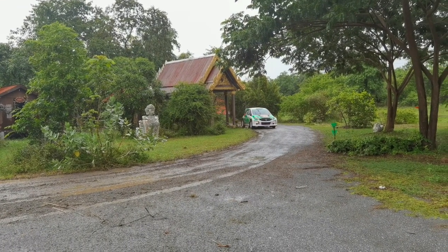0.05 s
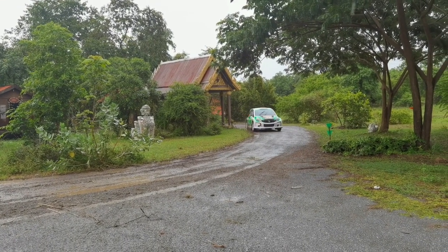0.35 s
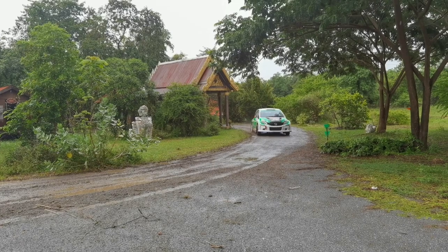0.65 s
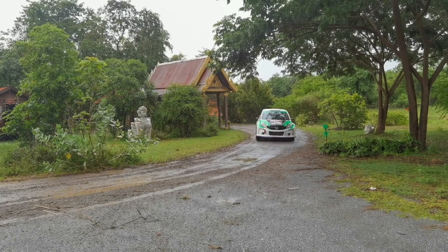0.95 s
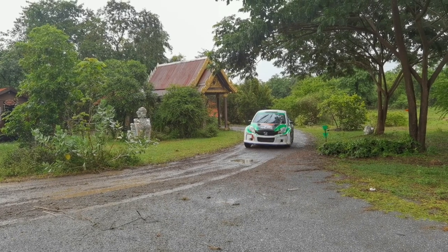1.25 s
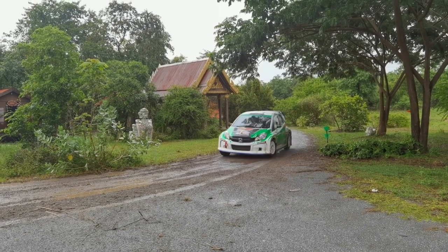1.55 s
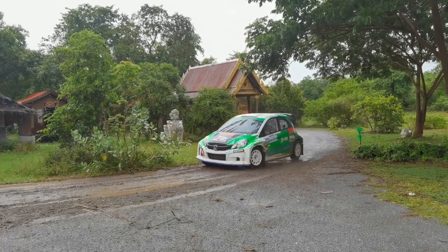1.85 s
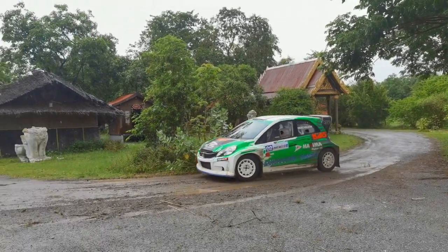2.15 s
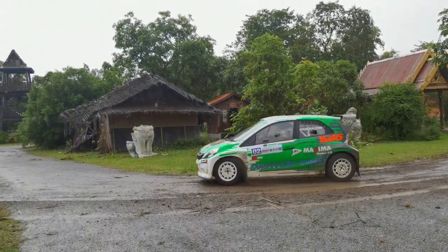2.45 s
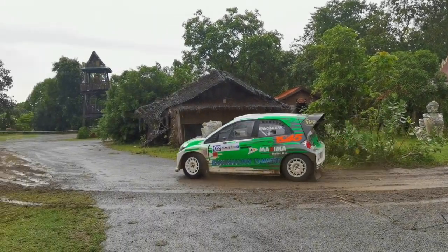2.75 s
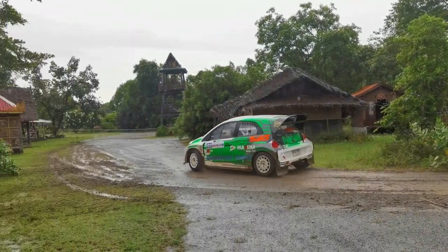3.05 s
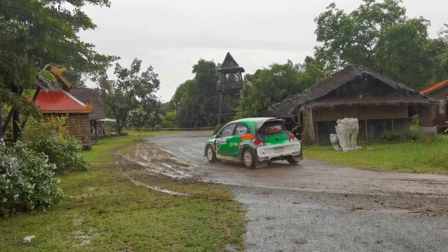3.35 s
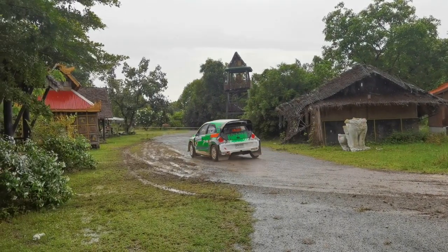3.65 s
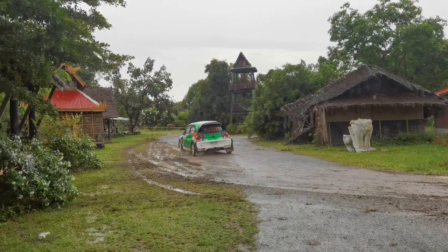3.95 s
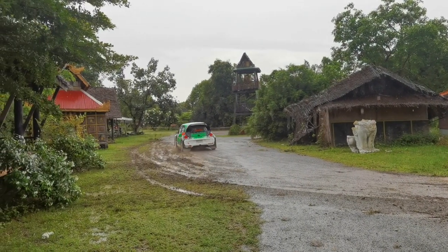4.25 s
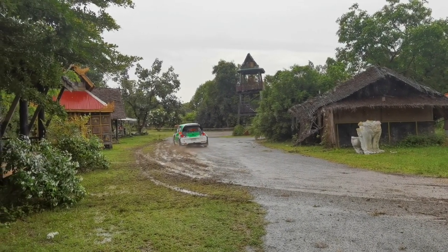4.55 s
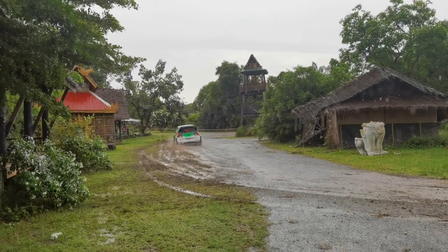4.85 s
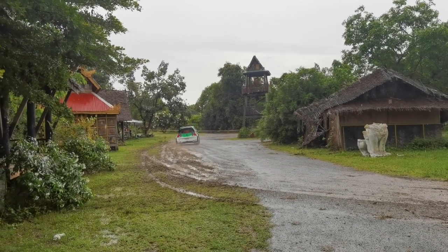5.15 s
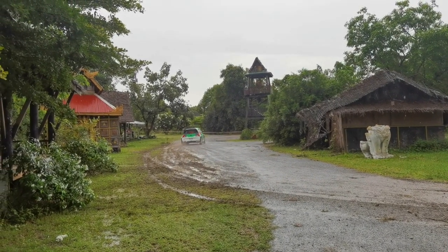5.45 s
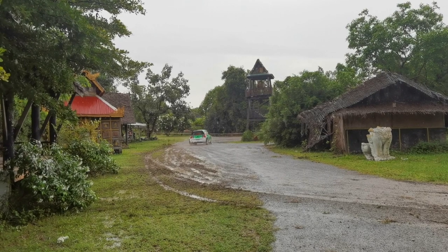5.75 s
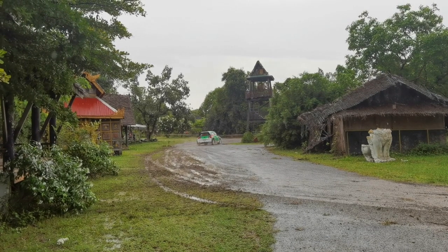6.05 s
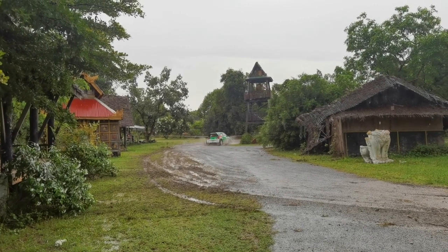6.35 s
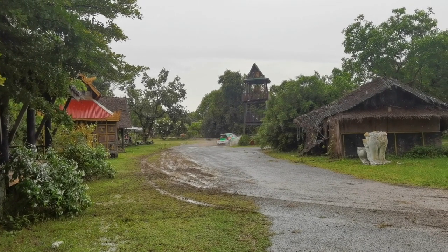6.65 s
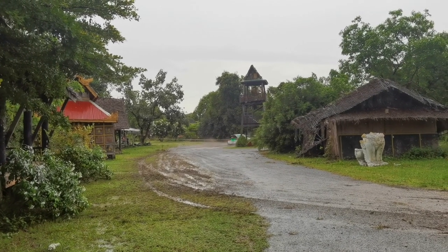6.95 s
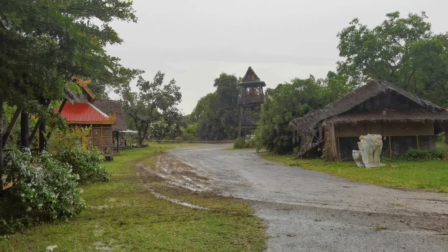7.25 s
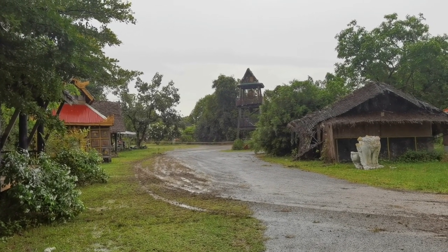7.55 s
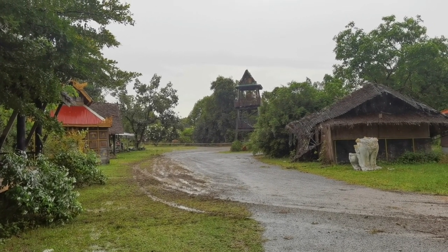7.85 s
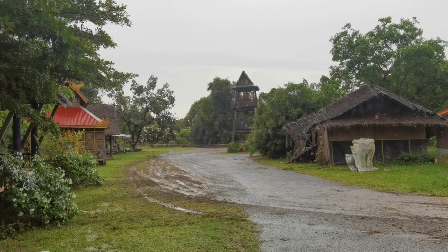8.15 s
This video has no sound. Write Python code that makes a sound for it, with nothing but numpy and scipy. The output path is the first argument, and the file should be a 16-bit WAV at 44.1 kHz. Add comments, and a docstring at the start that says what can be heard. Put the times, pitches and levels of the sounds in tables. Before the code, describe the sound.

A four-cylinder rally car comes round a wet bend outdoors, its exhaust thumping and barking on the throttle and burbling unevenly off it. The tyres hiss on the wet road as it passes close to the microphone. The exhaust then crackles under full load, grit ticks on the body, and the car recedes in short bursts of throttle, with a light echo from trees and huts.

```python
"""A four-cylinder rally car comes round a wet bend, its sound scattered by trees and huts.
Each firing thumps, barks and hisses out of the exhaust; off the throttle it burbles unevenly.
After two seconds the tyres hiss loudest on the wet road and the car passes close by.
Near four seconds the steel tailpipe swings round to face the listener and crackles at full load.
From five seconds grit ticks on the body as the car drives off in bursts of throttle."""
import sys
import numpy as np
from scipy import signal
from scipy.fft import rfft, irfft
from scipy.io import wavfile
from scipy.ndimage import uniform_filter1d, minimum_filter1d

SR = 44100
rng = np.random.default_rng(int(sys.argv[2]) if len(sys.argv) > 2 else 0)


def unload_wav(signal):
    """Save mono or channel-first audio to the path in sys.argv[1] as 16-bit WAV at rate SR, clipped to [-1, 1]."""
    wavfile.write(
        sys.argv[1],
        SR,
        np.round(np.clip(np.atleast_2d(signal).T, -1, 1) * 32767).astype(np.int16),
    )


N = 370792
T = np.arange(N) / SR


def amp(db):
    """Turns decibels into a factor to multiply by."""
    return 10 ** (np.asarray(db) / 20)


def evened(x):
    """Scales a whole sound so that its average level (rms) is 1."""
    return x / np.sqrt(np.mean(x ** 2) + 1e-20)


def levelled(x):
    """Holds the level near 1 from moment to moment."""
    power = uniform_filter1d(uniform_filter1d(x ** 2, size=2400), size=2400)
    return x / np.sqrt(abs(power) + 1e-14)


def curves(rows):
    """Joins the rows of a time table with straight lines, giving one curve a column."""
    seconds, *columns = np.transpose(rows)
    return [np.interp(T, seconds, column) for column in columns]


def held(rest, events, values, attack_s, release_s):
    """A curve that slides from rest to each event's value, stays there, then slides back."""
    out = rest + np.zeros(N)
    for (start, end, *_), value, fall_s in zip(events, values, release_s * np.ones(len(events))):
        span = slice(max(int((start - attack_s) * SR), 0), int((end + fall_s) * SR))
        share = np.minimum(1 + (T[span] - start) / attack_s, 1 - (T[span] - end) / fall_s)
        out[span] += np.clip(share, 0, 1) * (value - out[span])
    return out


def at_frequency(points, hz):
    """Looks up a table of frequencies, blending between its rows."""
    known_hz, values = np.transpose(points)
    return np.interp(np.log(hz + 1), np.log(known_hz + 1), values)


def colour(x, points, resonances=(), size=4096):
    """Makes some frequencies louder and others softer, with resonances on top."""
    hz = abs(np.fft.fftfreq(size, 1 / SR))
    peaks_db = sum(db / (1 + (2 * (hz - centre) / width) ** 2) for centre, width, db in resonances)
    log_gain = np.log(amp(np.maximum(at_frequency(points, hz) + peaks_db, -100)))
    taps = np.fft.ifft(np.exp(np.conj(signal.hilbert(log_gain)))).real  # rings after a sound, not before
    return signal.oaconvolve(x, taps[:size // 2])[:len(x)]


def band(x, low_hz, high_hz, order=4):
    """Keeps what lies between two frequencies."""
    return signal.sosfilt(signal.butter(order, [low_hz, high_hz], "band", fs=SR, output="sos"), x)


def wander(rate_hz):
    """A smooth random wobble, about 1 in size."""
    return evened(signal.sosfilt(signal.butter(2, rate_hz, fs=SR, output="sos"), rng.standard_normal(N)))


def scatter(x, fade_s, size=24000):
    """Scattered echoes that die away by 60 dB in fade_s."""
    t = np.arange(size) / SR
    echoes = rng.standard_normal(size) * (rng.random(size) < .1) * amp(-60 * t / fade_s)
    return signal.oaconvolve(x, echoes / np.linalg.norm(echoes))[:N]


# How we face the car. Each row: time in seconds, view.
# The five views: 0 front, 1 side, 2 rear, 3 in the far bend, 4 beyond the huts.
VIEWS = [(0, 0), (2.2, 0), (2.7, 1), (3.4, 1), (4.1, 2), (5.3, 2), (6.6, 3), (7.3, 3), (7.7, 4), (8.41, 4)]


def by_view(values):
    """Blends five values, one for each view, as the car turns."""
    view, = curves(VIEWS)
    return np.interp(view, np.arange(len(values)), values)


# Presses of the throttle. Each row: start and end in seconds, levels in dB of thump, drone,
# throaty body, bark and gas hiss, then release time in seconds.
PRESSES = [(0, 0.033, -18.5, -23, -26.5, -37.5, -20.5, 0.072),
           (0.119, 0.22, -17.5, -23.5, -21.5, -28.5, -24.5, 0.094),
           (.223, 0.34, -31.5, -19, -24.5, -25, -17.5, 0.29),
           (0.409, 0.471, -22, -25, -28.5, -28, -15, 0.2),
           (0.536, 0.67, -31.5, -28.5, -32.5, -32.5, -17, 0.16), (0.818, 1, -26, -37, -38, -33, -31, .08),
           (0.963, 1.153, -23, -30.5, -39.5, -43, -37, 0.063),
           (1.349, 1.575, -23.5, -17, -35.5, -29.5, -23.5, 0.055),
           (1.78, 1.9, -21.5, -17.5, -27, -26, -20.5, 0.12), (1.951, 2.07, -17, -14.5, -31, -24, -19, 0.18),
           (2.1, 2.22, -19.5, -21, -33.5, -30.5, -18, 0.15),
           (2.636, 2.73, -17.5, -13.5, -26.5, -27.5, -21.5, .1),
           (2.729, 2.826, -15.5, -19.5, -24.5, -27, -18, 0.19),
           (2.92, 3.34, -17, -21.5, -23.5, -24.5, -17, 0.052),
           (3.429, 3.585, -22, -18.5, -28.5, -25, -18.5, 0.1),
           (3.859, 3.99, -35.5, -26.5, -37, -28.5, -19.5, 0.069),
           (4.228, 4.48, -29, -38, -34.5, -33, -28, 0.061),
           (4.587, 4.75, -33.5, -41, -35.5, -34, -31, 0.064),
           (4.881, 4.994, -31.5, -40.5, -35.5, -34, -29.5, 0.042),
           (5.579, 5.6, -35.5, -36.5, -47.5, -45.5, -48.5, 0.12),
           (5.834, 5.933, -24.5, -40.5, -39.5, -34, -29.5, 0.12),
           (6.494, 6.54, -43.5, -59, -53, -45.5, -47, 0.076),
           (6.671, 6.785, -28.5, -35.5, -39.5, -36.5, -29.5, 0.14),
           (6.882, 6.95, -33.5, -42, -42.5, -43, -31.5, 0.066),
           (7.081, 7.179, -33.5, -37, -43.5, -41, -32, .11), (7.745, 7.73, -45, -34, -45, -46, -45.5, 0.66),
           (7.898, 8.1, -38, -36.5, -40.5, -46, -40.5, 0.071),
           (8.191, 9, -44.5, -36.5, -39.5, -46, -40.5, 0.086)]
# The exhaust between presses. Each row: time in seconds, then the same five levels in dB.
COASTING_LEVELS = [(0, -46, -28, -41, -47, -20), (0.799, -47, -26, -30, -32, -22),
                   (1.22, -29, -57, -38, -41, -34), (1.66, -35.5, -23, -41, -36, -25.5),
                   (2.421, -33, -24.5, -33.5, -35, -25), (2.558, -37, -30, -33, -30.5, -22),
                   (3.37, -27, -17, -34, -34, -23.5), (3.759, -29.5, -25, -43, -30.5, -22.5),
                   (4.13, -33, -27.5, -39, -38.5, -33), (4.5, -31.5, -29, -35, -38, -28),
                   (5.099, -41.5, -48.5, -42, -45.5, -41.5), (5.45, -43, -48, -53.5, -52.5, -57),
                   (6.049, -49, -45, -47.5, -50, -47), (6.38, -41, -51.5, -56.5, -53.5, -56),
                   (7.0, -31, -34, -45, -49, -35), (7.35, -50, -54, -51, -54, -57),
                   (7.621, -45, -51.5, -59.5, -63.5, -62.5), (8.41, -50, -32, -35, -35, -36)]


def throttle(swell_s=.066, lift_off_s=.35):
    """The engine's load (0 coasting, 1 pressed) and the five levels that each press moves."""
    load = held(0, PRESSES, np.ones(len(PRESSES)), swell_s, lift_off_s)
    *pressed_db, release_s = np.transpose(PRESSES)[2:]
    levels_db = [held(rest, PRESSES, pressed, swell_s, release_s)
                 for rest, pressed in zip(curves(COASTING_LEVELS), pressed_db)]
    return load, levels_db


# One number a view: how much the low tones waver at full roughness, in dB.
WAVER_DB = [8.5, 9, 8, 8, 4.5]
# One number a view: the third tone's level against the burble, in dB.
THIRD_TONE_DB = [-1, 0.5, -1, -1, -6]


def boom(cycles, rough, thump_db, drone_db, burble_db):
    """Three wavering low tones, at one, two and three times the firing rate."""
    tones = np.zeros(N)
    for multiple, db in enumerate([thump_db, drone_db, burble_db + by_view(THIRD_TONE_DB)], 1):
        waver_db = rough * by_view(WAVER_DB) * wander(14.5)
        tones += amp(db + waver_db) * np.cos(2 * np.pi * multiple * (cycles + .5))
    return np.sqrt(2) * amp(.4) * tones


# The four cylinders. Each row: strength in dB, extra delay along its own pipe in seconds.
CYLINDER_QUIRKS = [(1, 0), (-1.2, .00024), (.6, .00004), (-.4, .00017)]
# One number a view: the factor that multiplies those strengths and delays.
QUIRK_FACTOR = [.8, .9, .8, 1, 1.6]


def firings(cycles, rough, rebound=.15, spread_db=6, jitter_s=.0004):
    """A pressure pulse at each firing and a weaker rebound after it; unequal pipes make the beat limp."""
    at = np.flatnonzero(np.diff(np.floor(2 * cycles)))
    count = np.arange(len(at))
    chance = rng.standard_normal((len(at), 2))
    cylinder = count // 2 % len(CYLINDER_QUIRKS)
    own_db, pipe_s = np.array(CYLINDER_QUIRKS)[cylinder].T * by_view(QUIRK_FACTOR)[at]
    strength = amp(own_db + spread_db * rough[at] * chance[:, 0]) * np.where(count % 2, rebound, 1)
    delay_s = pipe_s + jitter_s * rough[at] * chance[:, 1]
    arrival = np.clip(at + SR * delay_s, 0, N - 1).astype(int)
    return evened(np.bincount(arrival, strength, N))


# One number a view: the share of the note, 0 to 1, that comes by way of trees and walls under load.
DETOUR_SHARE = [.72, .45, .25, .52, .4]


def detours(x, load, coasting_share=.92):
    """Paths of different length mix, so overtones swell and break up as the revs change."""
    share = load * by_view(DETOUR_SHARE) + (1 - load) * coasting_share
    return np.sqrt(1 - share ** 2) * x + share * scatter(x, fade_s=.35)


def gas(cycles, steady, fade_cycles):
    """Rushing gas: a steady noise plus a puff at each firing."""
    puffs = np.exp(-(cycles % 1) / fade_cycles)
    return evened((steady + puffs) * rng.standard_normal(N))


def round_trips(x, trips_per_s=151, share=.074):
    """Each pulse runs up and down the whole exhaust, weaker every time."""
    return sum(share ** trip * np.roll(x, round(trip * SR / trips_per_s)) for trip in range(4))


# The exhaust's tone colour in each view. Each row: frequency in Hz, level in dB.
FRONT_COLOUR = [(200, 9.5), (390, 7), (490, 9), (600, 4), (730, 1.5), (880, 6), (1150, -7.5), (1500, -2),
                (1800, -13.5), (2500, -11), (4500, -9), (6500, -2.5), (8600, -4), (10000, -10.5),
                (12500, -18.5), (15000, -21)]
SIDE_COLOUR = [(200, -15), (350, 13), (440, 16), (560, 5), (660, 0), (900, -5.5), (1100, -12),
               (1300, -23.5), (1480, -13), (1800, -27), (3200, -21), (4900, -26.5), (6500, -16.5),
               (8500, -19), (10000, -30.5), (12500, -35), (15000, -49)]
REAR_COLOUR = [(200, -17.5), (350, 12), (470, -2.5), (580, -2), (700, 5), (930, 7.5), (1250, -13.5),
               (1500, -2), (1800, -22.5), (2200, -16.5), (4000, -27.5), (5200, -21), (6200, -15.5),
               (8500, -20), (10000, -26.5), (12500, -33), (15000, -72)]
BEND_COLOUR = [(200, -21), (350, 14), (480, 2.5), (680, -7), (900, 8), (1250, -13.5), (1550, -2.5),
               (1800, -16.5), (2300, -14.5), (3100, -17), (4000, -20), (4600, -18), (5200, -13.5),
               (6200, -10), (8400, -14), (10000, -20), (12500, -38), (15000, -71)]
BEYOND_COLOUR = [(200, -3), (350, 11.5), (470, 16), (680, 5.5), (920, 18), (1300, -8.5), (1550, -3.5),
                 (1800, -17.5), (2300, -20), (3100, -20.5), (3900, -28), (4600, -21.5), (6200, -6.5),
                 (8500, -11), (10000, -19), (12500, -55)]
# Where the tailpipe rings. Each row: frequency in Hz, width in Hz, boost in dB.
PIPE_RESONANCES = [(787, 380, 6.5), (1100, 320, 7), (1344, 220, 9), (2090, 630, 6.5), (3010, 570, 3),
                   (3348, 57, 7), (4450, 106, 6.5), (8730, 1930, 10)]
# The growl's peaks and hollows, one list a view. Each row: frequency in Hz, width in Hz, gain in dB.
GROWL_SHAPES = [
    [(428, 60, -3), (697, 120, -4.5), (860, 70, 4), (1160, 64, -3), (1570, 95, 4)],
    [(342, 60, 3), (522, 38, 3), (690, 90, -3), (950, 76, 5), (1095, 63, 6.5), (1189, 90, -9),
     (1307, 70, 9), (1600, 71, -2)],
    [(505, 56, 8.5), (640, 70, -2.5), (1025, 65, 4), (1160, 110, -4), (1560, 83, 3)],
    [(400, 50, -1.5), (489.4, 104, 2.5), (713, 68, 2), (2681, 140, -6), (3418, 156, -12)],
    [(385.8, 60, -3), (506, 64, 4), (554.7, 34.7, -7), (810, 80, -7), (1191, 70, -6), (1480, 88, 7)],
]
# One close echo for each view. Each row: delay in seconds, strength as a share of the direct sound.
CLOSE_ECHOES = [(0.00078, 0.083), (0.00095, 0.045), (0.00137, 0.042), (.00133, 0.14), (0.00094, 0.18)]


def tailpipe(x):
    """The pipe rings; its colour and a close echo change as the car turns."""
    view, = curves(VIEWS)
    colours = [FRONT_COLOUR, SIDE_COLOUR, REAR_COLOUR, BEND_COLOUR, BEYOND_COLOUR]
    out = np.zeros(N)
    for k, (tone, growl, (delay_s, share)) in enumerate(zip(colours, GROWL_SHAPES, CLOSE_ECHOES)):
        weight = 1 - abs(view - k)
        heard = weight > 0
        direct = colour(x[heard], tone, list(PIPE_RESONANCES) + list(growl))
        echo = share * np.roll(direct, round(delay_s * SR))
        out[heard] += weight[heard] * (direct + echo)
    return out


def road_bounce(x):
    """Adds a bounce off the wet road, whose delay shifts as the car rocks and moves."""
    delay_s = .0027 + .00012 * wander(2)
    return x + .5 * np.interp(T - delay_s, T, x)


# One number a view: the rasp's level against the average of bark and hiss, in dB.
RASP_OFFSET_DB = [-2, -6.5, -7.5, -7, -0.5]


def roar(cycles, rough, pulses, note, flow, body_db, bark_db, hiss_db):
    """Body, bark, rasp and hiss leave the pipe; the higher the sound, the more of it is rushing gas."""
    body = tailpipe(round_trips(flow))
    bark = tailpipe(note + 2.3 * rough * gas(cycles, steady=.9, fade_cycles=.5))
    rush = gas(cycles, steady=1, fade_cycles=.98) * amp(.88 * wander(51))
    jet = road_bounce(tailpipe(rush + .037 * pulses))
    rasp_db = (bark_db + hiss_db) / 2 + by_view(RASP_OFFSET_DB)
    return (amp(body_db + 1) * levelled(band(body, 290, 723, order=5))
            + amp(bark_db - 1) * levelled(band(bark, 767, 1740))
            + amp(rasp_db) * levelled(band(jet + .5 * bark, 1930, 5740))
            + amp(hiss_db - .28) * levelled(band(jet, 4100, 11160)))


# The revs. Each row: time in seconds, firings per second.
FIRING_RATE = [(0.0, 87.7), (0.06, 86.3), (0.1, 95.3), (0.16, 112.2), (0.18, 113.4), (0.34, 95.6),
               (0.38, 95.3), (0.46, 102.1), (0.56, 95.9), (0.6, 96.3), (0.66, 100.6), (0.98, 96.5),
               (1.06, 91.6), (1.22, 98.5), (1.46, 84.9), (1.6, 89.2), (1.68, 88.1), (1.76, 94.5),
               (1.8, 93.6), (1.86, 86.3), (1.96, 94.1), (2.06, 96.7), (2.18, 92.6), (2.3, 82.5),
               (2.36, 75.9), (2.5, 71.6), (2.54, 72.4), (2.58, 75.3), (2.66, 90.6), (2.8, 82.8),
               (3.02, 89.8), (3.1, 84.1), (3.16, 87.9), (3.3, 86.6), (3.48, 91.6), (3.56, 86.7),
               (3.66, 92.5), (3.96, 97.1), (4.06, 105.0), (4.14, 106.8), (4.22, 113.2), (4.34, 115.1),
               (4.5, 108.3), (4.58, 113.2), (4.66, 112.7), (4.9, 122.6), (4.94, 121.7), (5.04, 114.4),
               (5.12, 114.6), (5.18, 110.5), (5.38, 103.9), (5.58, 108.7), (5.74, 106.2), (5.84, 129.0),
               (6.04, 107.0), (6.2, 102.8), (6.4, 97.7), (6.5, 102.9), (6.58, 105.0), (6.68, 122.7),
               (6.72, 120.0), (6.78, 119.8), (6.86, 115.9), (6.92, 118.5), (6.98, 114.9), (7.14, 119.4),
               (7.26, 107.8), (7.46, 101.2), (7.66, 103.2), (7.72, 106.9), (7.84, 107.4), (7.92, 113.1),
               (8.06, 110.0), (8.22, 119.5), (8.34, 115.5), (8.38, 118.8)]
# One number a view: how uneven (rough) the firing is, 0 to 1, on and off the throttle.
ROUGH_ON = [.22, .11, .11, .17, .16]
ROUGH_OFF = [.5, .42, .44, .42, .4]
# One number a view: the burble's level against the body at full roughness, in dB.
BURBLE_OFFSET_DB = [9.8, 10.3, 10.8, 11.5, 9.4]
# Hollow burps. Each row: start and end in seconds, burble level in dB.
HOLLOW_BURPS = [(0.11, 0.13, -17), (1.846, 1.902, -23.5), (2.244, 2.34, -23.5), (2.566, 2.607, -21.5),
                (2.77, 2.825, -27.5), (3.06, 3.111, -25.5)]
# One number a view: how much the roar surges at full roughness, in dB.
ROAR_SURGE_DB = [6, 7, 6, 6, 3]


def exhaust():
    """All the exhaust's sounds follow one firing beat, which turns rougher off the throttle."""
    rate, = curves(FIRING_RATE)
    load, (thump_db, drone_db, body_db, bark_db, hiss_db) = throttle()
    rough = load * by_view(ROUGH_ON) + (1 - load) * by_view(ROUGH_OFF)
    resting_db = body_db + 20 * np.log10(rough) + by_view(BURBLE_OFFSET_DB)
    burp_db = np.transpose(HOLLOW_BURPS)[2]
    burble_db = held(resting_db, HOLLOW_BURPS, burp_db, attack_s=.073, release_s=.17)
    cycles = np.cumsum(rate * (1 + .023 * rough * wander(30))) / SR  # goes up by 1 each firing
    low_tones = boom(cycles, rough, thump_db, drone_db, burble_db)
    pulses = firings(cycles, rough)
    note = np.sqrt(1 - rough ** 2) * detours(pulses, load)
    flow = note + 1.15 * rough * gas(cycles, steady=.8, fade_cycles=.5)
    voice = roar(cycles, rough, pulses, note, flow, body_db, bark_db, hiss_db)
    rumble = burble(cycles, burble_db)
    surge = amp(by_view(ROAR_SURGE_DB) * rough * wander(7.7))
    return low_tones + surge * voice + rumble + flares(flow) + crackle(cycles)


def burble(cycles, level_db):
    """Uneven firings fill the gaps between the low tones with puffs of deep noise."""
    return amp(level_db) * evened(band(gas(cycles, steady=1, fade_cycles=.99), 112, 308))


# The hiss of the tyres. Each row: time in seconds, level in dB.
SPRAY_LEVELS = [(0, -51), (2.3, -31.5), (3.3, -52), (4.1, -51), (8.41, -79)]
# Its tone colour. Each row: frequency in Hz, level in dB.
SPRAY_TONE = [(500, 2.5), (2000, -2.5), (4000, -6.5), (8000, -12.5), (11500, -12.5), (15000, -30)]


def tyre_spray(drops_per_s=2500, spread_db=5):
    """On the wet road the tyres throw a dense patter of drops inside a fizz."""
    level_db, = curves(SPRAY_LEVELS)
    drops = (rng.random(N) < drops_per_s / SR) * rng.standard_normal(N)
    drops *= amp(spread_db * np.minimum(rng.exponential(1, N), 3))
    fizz = .8 * rng.standard_normal(N)
    water = (evened(drops) + fizz) * amp(2.2 * wander(25))
    return amp(level_db) * evened(colour(water, SPRAY_TONE))


# The tone colour of the open air. Each row: frequency in Hz, level in dB.
AIR_TONE = [(20, -50), (90, -15), (250, -10), (900, -31), (1700, -46), (4000, -40), (8500, -37),
            (10300, -33), (11500, -76)]


def outdoor_air(level_db=-57):
    """A quiet, steady hush behind the car."""
    return amp(level_db) * evened(colour(rng.standard_normal(N), AIR_TONE))


# Moments when the revs pull through a pipe resonance or the outlet swings toward the listener.
# Each row: start and end in seconds, frequency in Hz, width in Hz, level in dB.
PIPE_FLARES = [(.23, .3, 633, 70, -24), (.4, 0.624, 584, 70, -29), (.72, .82, 508, 60, -35),
               (.42, .52, 3290, 260, -30.5), (0.803, .93, 872, 50, -39), (1.952, 2.07, 855, 59, -31),
               (2.707, 2.82, 892, 100, -27), (3.443, 3.645, 1447, 81, -33.5),
               (3.395, 3.676, 4380, 320, -33.5), (3.784, 3.993, 957, 70.05, -34),
               (4.207, 4.43, 891, 50, -43), (4.569, 4.697, 894, 49, -47), (4.72, 4.85, 704, 54.7, -34),
               (4.934, 5.02, 722, 50.3, -32.5), (6.66, 6.8, 2890, 129.8, -42),
               (7.88, 8.099, 489, 70.3, -45)]


def flares(flow, rise_s=.052, fall_s=.049):
    """The firings ring one resonance hard; overtones swell as they slide through it."""
    out = np.zeros(N)
    for start, end, hz, width_hz, db in PIPE_FLARES:
        span = slice(max(int((start - rise_s) * SR), 0), int((end + fall_s) * SR))
        peak = signal.iirpeak(hz, hz / width_hz, SR)
        ring = signal.lfilter(*peak, signal.lfilter(*peak, flow[span]))
        swell = np.minimum(1 + (T[span] - start) / rise_s, 1 - (T[span] - end) / fall_s)
        out[span] += amp(db) * np.clip(swell, 0, 1) * evened(ring)
    return out


# Crackles at full load. Each row: start and end in seconds, level in dB, unevenness in dB,
# and how straight the pipe points at the listener, 0 to 1.
CRACKLE_BURSTS = [(3.55, 3.64, -31, 3, .6), (3.715, 3.81, -22.5, 1.5, 1), (3.87, 3.93, -17.5, 2, 1),
                  (3.96, 4.01, -23, 2.5, .9), (5.84, 5.88, -30, 3, 0), (6.69, 6.725, -23, 1.8, .06),
                  (6.76, 6.83, -25.5, 3, .05), (6.87, 6.95, -31, 3, 0), (7.09, 7.19, -34, 2.5, 0)]
# The shocks' colour in line with the pipe and off to one side. Each row: frequency in Hz, level in dB.
IN_LINE_COLOUR = [(1500, -20), (2300, -7), (3000, -13), (3500, -7), (3750, -9), (4020, -24), (4300, -6),
                  (5200, -8), (6500, -13.5), (8500, -5), (9700, -9), (11500, -16), (15000, -25)]
OFF_LINE_COLOUR = [(1500, -18), (2300, -9), (2730, -19), (2900, -8), (3150, -8), (3480, -20), (3700, -12),
                   (4100, -26), (4500, -16), (5000, -14), (5600, -3), (6300, -1), (7400, -5), (8300, -5),
                   (10000, -11), (12500, -21), (15000, -45)]
# The ring of the pipe's steel. Each row: frequency in Hz, width in Hz, gain in dB.
STEEL_RESONANCES = [(3050, 160, 4), (4400, 280, 9), (5050, 150, 6), (5580, 140, 7), (6150, 160, 6),
                    (6450, 130, 5), (6780, 200, -4), (7050, 200, 6), (7420, 220, -4), (8300, 300, 8),
                    (8980, 240, 6), (10520, 220, 6)]


def crackle(cycles, puff_rise_s=.0005, puff_fade_s=.002):
    """Each firing leaves as a sharp shock and a short jet of gas, which ring the steel pipe."""
    start, end, top_db, uneven_db, aim = np.transpose(CRACKLE_BURSTS)
    level_db = held(-75, CRACKLE_BURSTS, top_db, attack_s=.12, release_s=.12)
    uneven_db, aim = [np.interp(T, (start + end) / 2, column) for column in (uneven_db, aim)]
    strength = amp(uneven_db * np.clip(rng.standard_normal(N), -2, 2))
    shocks = np.diff(np.floor(cycles), prepend=0) * strength
    t = np.arange(0, 10 * puff_fade_s, 1 / SR)
    puff = (1 - np.exp(-t / puff_rise_s)) * np.exp(-t / puff_fade_s)
    jets = signal.oaconvolve(shocks, puff)[:N] * rng.standard_normal(N)
    cracks = .5 * evened(shocks) + evened(jets)
    ring = scatter(cracks, fade_s=.09)
    in_line = evened(colour(cracks + .4 * ring, IN_LINE_COLOUR, STEEL_RESONANCES))
    off_line = evened(colour(cracks + ring, OFF_LINE_COLOUR, STEEL_RESONANCES))
    return amp(level_db) * evened(np.sqrt(aim) * in_line + np.sqrt(1 - aim) * off_line)


# Grit and sharp spits. Each row: start in seconds, level in dB, seconds to fade by 60 dB.
GRIT_HITS = [(5.036, -27, 0.019), (5.229, -35, 0.15), (5.3022, -41, 0.06), (5.565, -41, 0.019),
             (5.813, -23.5, 0.09), (5.9093, -18, 0.13), (6.2942, -44, 0.055), (7.553, -43, 0.035)]


def grit(rise_s=.00084):
    """Grit ticks on the body: short, bright bursts of noise."""
    bursts = np.zeros(N)
    for start, db, fade_s in GRIT_HITS:
        age = np.maximum(T - start, 0)
        bursts += amp(db - 60 * age / fade_s) * np.minimum(age / rise_s, 1)
    return amp(-.5) * bursts * evened(band(rng.standard_normal(N), 5250, 10000, order=6))


def trees_and_huts(car):
    """Trees and huts throw back the car's middle and upper tones, differently left and right."""
    bright = band(car, 420, 6000, order=3)
    return amp(-13) * np.array([scatter(bright, fade_s=.35) for _ in range(2)])


# Which side is louder. Each row: frequency in Hz, left minus right in dB.
LEFT_LOUDER = [(100, .3), (380, -.5), (580, 3), (930, -4.5), (1350, 2), (1800, -2), (3000, -3.5),
               (5400, -5), (7500, -1), (9200, 4), (10500, 0)]
# Which side is earlier. Each row: frequency in Hz, the left's head start in radians.
LEFT_EARLIER = [(100, .03), (280, .12), (450, .6), (690, 0), (900, .3), (1150, 1.7), (1350, .3),
                (1800, 1.4), (2600, .3), (6000, 0)]
# Ground echoes that differ between the sides. Each row: frequency in Hz, level in dB.
GROUND_ECHOES = [(60, -32), (200, -26), (450, -12), (750, -16), (1100, -4), (2000, -2), (5600, -1),
                 (6600, -6), (9000, -6.5), (12000, -3)]


def left_and_right(x):
    """Sound reaches the two sides with slightly different level, timing and ground echoes."""
    hz = np.fft.rfftfreq(N, 1 / SR)
    ratio = amp(at_frequency(LEFT_LOUDER, hz))
    balance = (ratio - 1) / (ratio + 1)
    timing = 1j * np.tan(at_frequency(LEFT_EARLIER, hz) / 2)
    side = irfft(rfft(x) * (balance + timing), N)
    side += colour(scatter(x, fade_s=.14), GROUND_ECHOES)
    return np.array([x + side, x - side])


def scene():
    """The car, its echo from trees and huts, and quiet outdoor air."""
    car = exhaust() + tyre_spray() + grit()
    echoes = trees_and_huts(car)
    return left_and_right(car + outdoor_air()) + echoes


def record(dry, top_hz=15600):
    """Briefly turns down peaks that pass full scale, then removes the very highest treble."""
    safe_gain = 1 / np.maximum(abs(dry).max(0), 1)
    gain = uniform_filter1d(minimum_filter1d(safe_gain, size=200), size=200)
    treble_cut = signal.firwin(511, top_hz, window=("kaiser", 9), fs=SR)
    return signal.oaconvolve(dry * gain, treble_cut[None], "same")


dry = scene()
out = record(dry)
unload_wav(out)
```